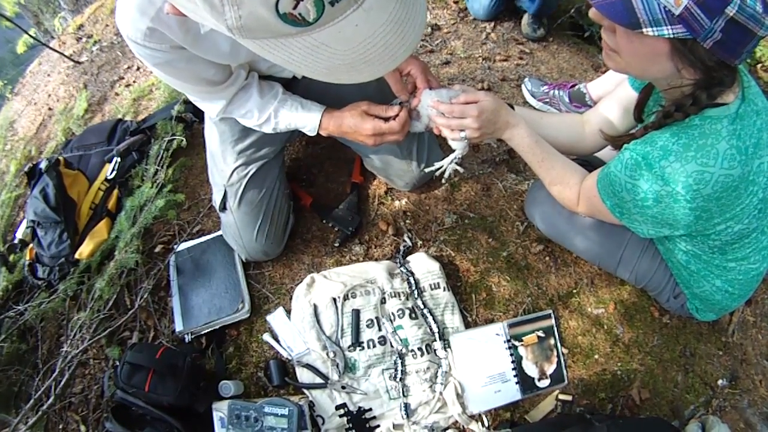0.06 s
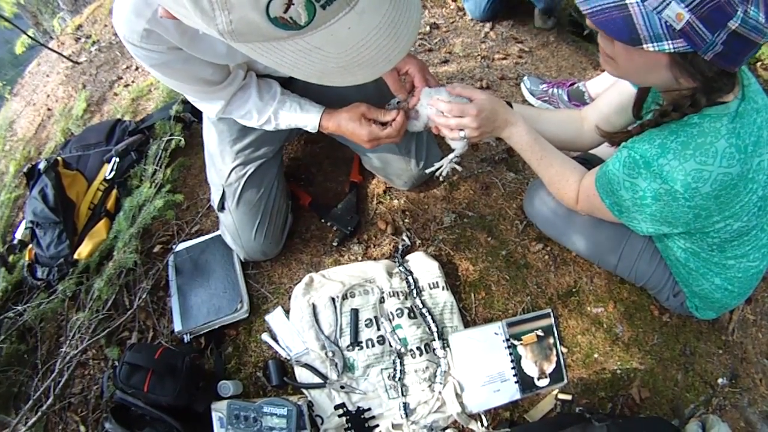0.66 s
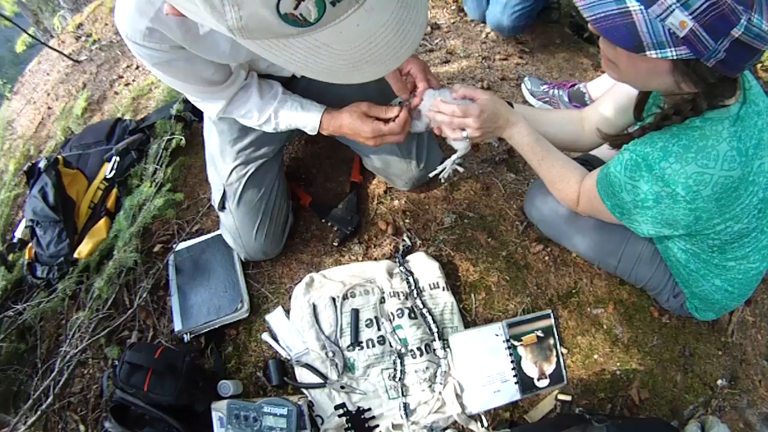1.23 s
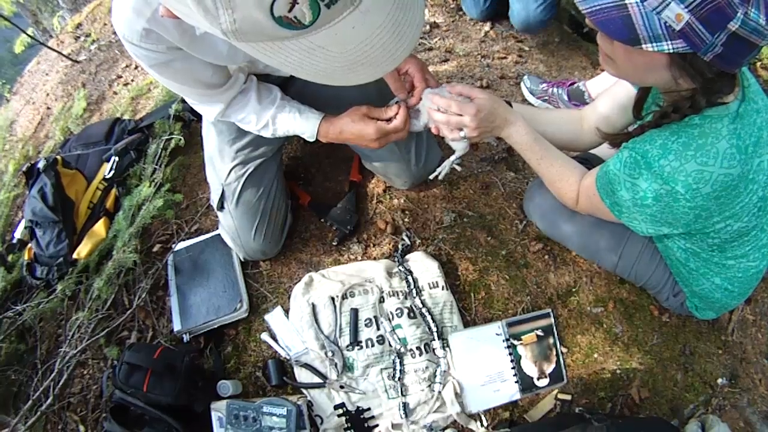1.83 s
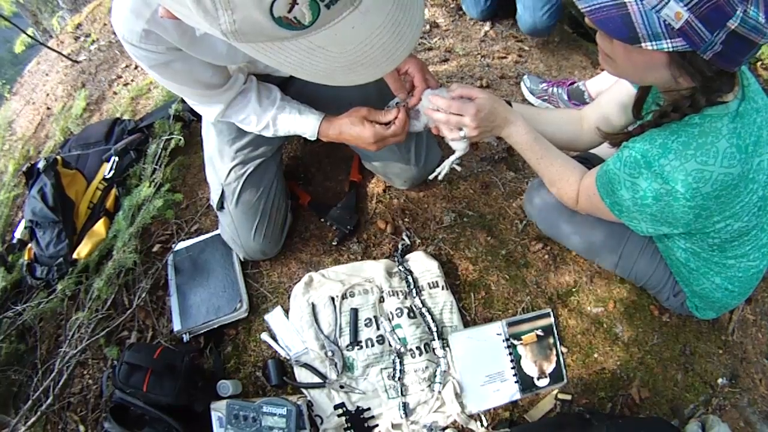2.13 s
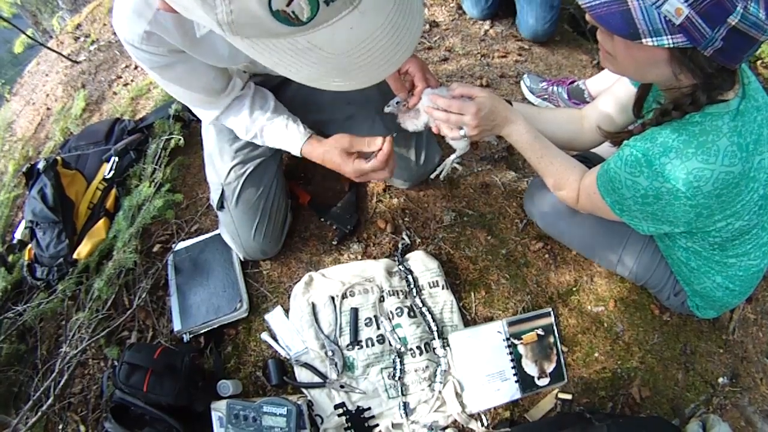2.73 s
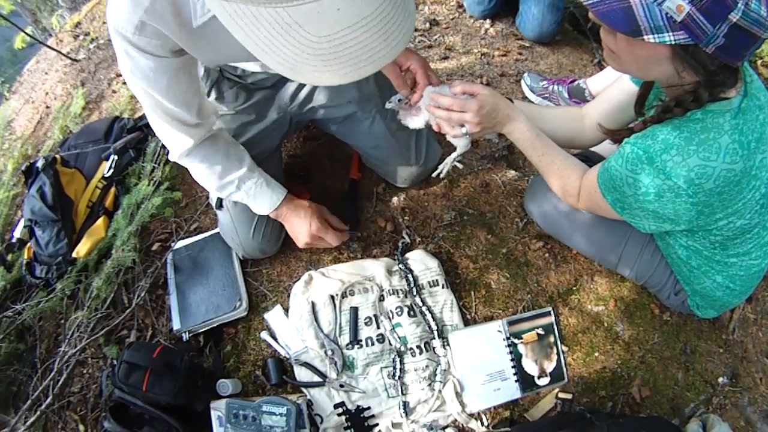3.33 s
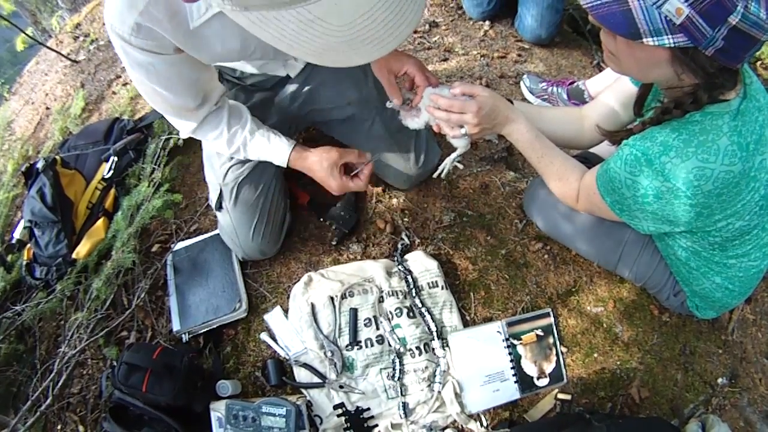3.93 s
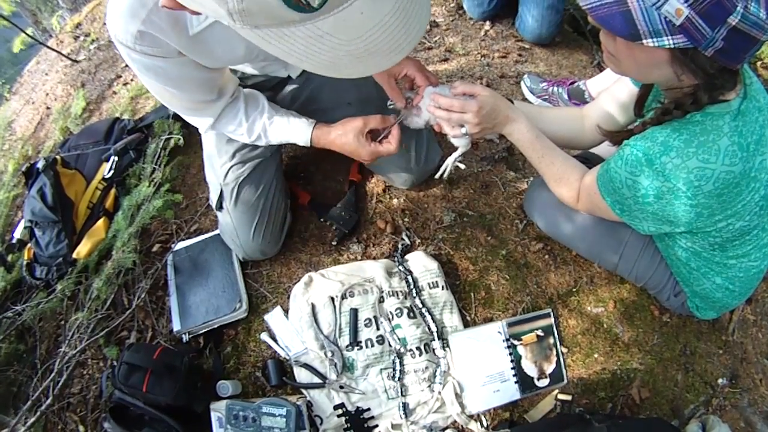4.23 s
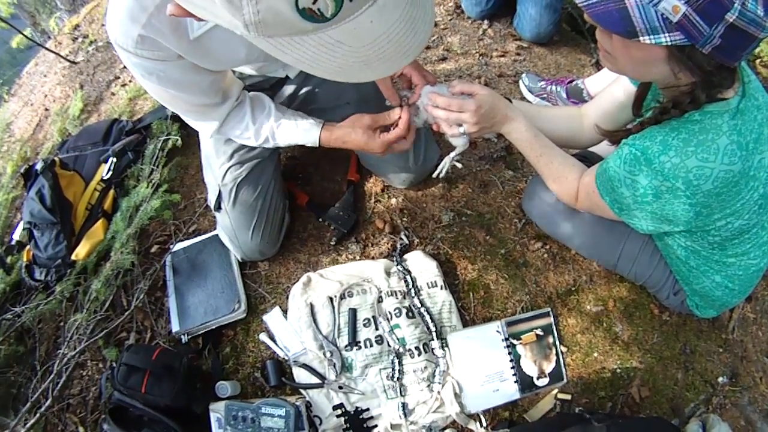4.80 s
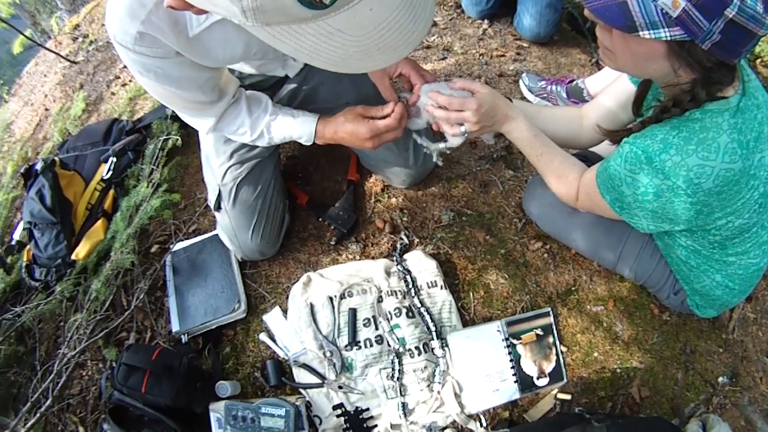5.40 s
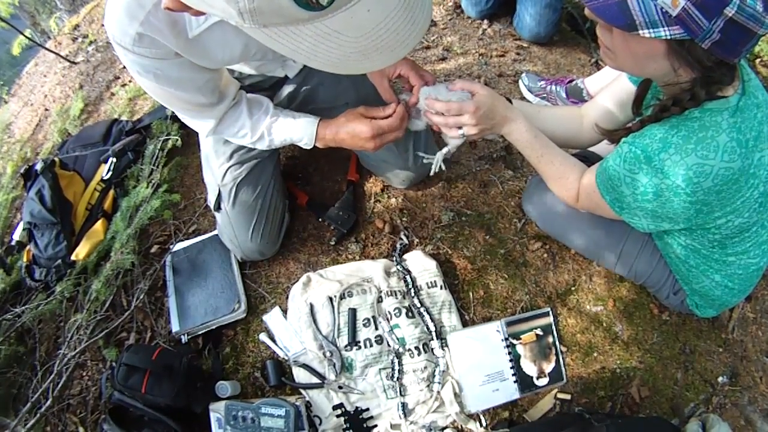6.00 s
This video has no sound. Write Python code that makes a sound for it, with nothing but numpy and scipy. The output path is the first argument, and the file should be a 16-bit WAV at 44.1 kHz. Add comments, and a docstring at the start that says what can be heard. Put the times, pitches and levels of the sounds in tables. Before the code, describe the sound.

Over soft outdoor hiss, a sharp click sounds, then a young bird of prey calls in a run of brief, raspy squeaks.

```python
"""On a forest floor, a falcon chick held in the hands complains close by.
Its syrinx sings a thin whistle and flutters in a hoarse rasp, then breaks into a short, mostly falling yelp.
Something hard snaps with a hollow knock, and small metal tools tick and ring, damped by the fingers.
Hands and knees bump and clothes rustle over the wide, steady hush of the forest."""
import sys
import numpy as np
from scipy import signal
from scipy.fft import rfft, irfft, next_fast_len
from scipy.io import wavfile
from scipy.ndimage import map_coordinates

SR = 44100
rng = np.random.default_rng(int(sys.argv[2]) if len(sys.argv) > 2 else 0)


def generate_wav(signal):
    """Clip the signal to [-1, 1] and save it as 16-bit WAV at the path in sys.argv[1]."""
    frames = np.transpose(np.atleast_2d(signal))
    scaled = np.clip(frames, -1, 1) * 32767
    pcm = np.round(scaled).astype(np.int16)
    wavfile.write(sys.argv[1], SR, pcm)


N = 271215
TOP_HZ = 15450
PRE_ROLL_S = 0.005  # room for each part of a call to fade in

# Colour of the air escaping with the voice. Each row: frequency in Hz, gain in dB.
BREATH_COLOUR = [(400, -34), (1000, -41), (2500, -17.5), (3200, 11), (3550, 0), (4100, 3), (4750, 2.5),
                 (5400, -4.5), (6150, 2), (7500, -8.5), (9500, -3), (11000, -15), (15000, -28)]


def chick(catch_s=0.0045, push_s=0.017, break_s=0.006, plain_overtones_db=-29):
    """The syrinx whistles over a growing rasp, pushes, catches, breaks into a yelp and closes hoarsely."""
    # The calls. Each row: yelp onset, lead-in length and yelp length in seconds; whistle, first yelp and
    # last yelp pitch in Hz; whistle, lead-in rasp, push and yelp level in dB; relative gain of the
    # octave, the upper overtones and the hiss in dB.
    calls = [ (2.003, .047, 0.0076, 2270, 1590, 1270, -46, -46.5, -42, -23, -39, -22, -26),
             (3.297, 0.074, 0.0091, 2304, 1793, 1290, -45, -48, -34, -23, -34, -29, -19),
             (3.600, 0.081, 0.023, 2140, 1360, 1320, -43, -45.5, -30, -13, -14.5, -20.5, -11),
             (3.859, 0.076, 0.018, 2090, 1462, 1250, -41, -40.5, -22.5, -13.5, -17, -14.5, -13),
             (4.094, .059, 0.038, 2074, 1520, 1258, -43, -46, -29, -12.5, -17.5, -12.5, -6),
             (4.322, 0.057, .021, 1950, 1602, 1306, -57, -39.5, -21, -10, -15.5, -11, -9),
             (4.39, 0.047, 0.017, 1400, 1374, 1344, -31, -34.5, -25.5, -14, -6, -12, -7),
             (4.791, 0.037, 0.04, 2250, 1876, 1890, -43, -41, -45, -35, -25, -25, -16),
             (4.878, 0.054, 0.014, 2390, 1270, 1183, -44, -44, -32, -24.5, -15, -12, -19),
             (5.26, .031, 0.035, 1750, 2366, 2440, -43, -41.5, -39, -26.5, -16, -6, -4),
             (5.347, 0.047, 0.017, 2250, 1630, 1466, -28.5, -32, -30, -10, -12.5, -29, -10.5),
             (5.698, .037, 0.015, 2384, 1632, 1315, -31, -41.5, -30, -15, -21, -26, -13.5),
             (6.135, .047, 0.028, 2266, 1835, 1560, -40, -37, -23, -12.5, -31, -29, -16)]
    out = np.zeros(N)
    for onset, lead, length, whistle_hz, yelp_hz, last_hz, *levels in calls:
        whistle_db, lead_db, push_db, yelp_db, octave_db, upper_db, hiss_db = levels
        start = onset - PRE_ROLL_S
        drop_hz = yelp_hz - whistle_hz
        # the whistle slides up, sinks and fades while the rasp grows under it
        whistle_glide = whistle_hz * 2 ** np.array([-0.117, 0, -0.055])
        add(out, start - lead, note(lead, whistle_glide, ramp(whistle_db, -9.5), -25, -25))
        add(out, start - lead, rasp(lead, 1750, lead_db - 3.5, lead_db + 3.5, hiss_db))
        # a last hoarse push, then the voice catches and breaks
        push_hz = whistle_hz + 0.74 * drop_hz
        add(out, start - catch_s - push_s, rasp(push_s, push_hz, push_db - 8, push_db, hiss_db))
        break_hz = whistle_hz + 0.541 * drop_hz
        break_glide = ramp(break_hz, yelp_hz - break_hz)
        voice_break = note(break_s, break_glide, ramp(-31, 4), plain_overtones_db, plain_overtones_db)
        add(out, start - break_s, voice_break)
        # the yelp holds and dies away; the flutter under it swamps weak yelps, strong ones ring clear
        yelp_glide = ramp(yelp_hz, last_hz - yelp_hz)
        yelp_fade_db = yelp_db + np.array([0, -4.5, -12])
        add(out, start, note(length, yelp_glide, yelp_fade_db, octave_db, upper_db))
        add(out, start, rasp(length, push_hz, -32, -46, hiss_db))
        # a quick closing plunge, and the rasp returns as the yelp dies
        plunge = last_hz * 2 ** ramp(0, -0.32)
        add(out, start + length, note(0.0061, plunge, ramp(-32, -4.5), octave_db, upper_db))
        add(out, start + 0.96 * length, rasp(0.02, last_hz, push_db - 7, push_db - 29.5, hiss_db))
    # At its harshest the voice doubles its period: start and length in seconds, pitch in Hz, level in dB.
    undertone = (4.392, .019, 688, -41)
    onset, length, hz, db = undertone
    growl = note(length, ramp(hz, 0), ramp(db, 0), plain_overtones_db, plain_overtones_db)
    add(out, onset - PRE_ROLL_S, growl)
    return out


def note(length, glide_hz, levels_db, octave_db, upper_db, jitter=0.019, shimmer_db=0.74, air_db=-17):
    """The syrinx sings a gliding, wavering tone; the throat shapes its upper overtones."""
    # Resonances of the throat. Each row: frequency in Hz, gain in dB.
    throat = [(3000, 4), (3900, -6.5), (4600, -3), (5400, -15), (6400, -10), (7600, -19), (9000, -10.5),
              (10200, -12.5), (11300, -26), (13000, -23), (15500, -41)]
    t = np.arange(-PRE_ROLL_S, 0.1, 1 / SR)
    progress = np.clip(t / length, 0, 1)
    pitch = arc(progress, *glide_hz) * (1 + jitter * wobble(t, 590))
    phase = 2 * np.pi * np.cumsum(pitch) / SR
    # each overtone swells on its own, and no two cycles are quite alike
    harmonics = np.arange(3, 11)[:, None]
    uneven_db = 2.4 * np.array([wobble(t, 140) for _ in harmonics])
    blur = 0.45 * np.array([wobble(t, 600) for _ in harmonics])
    gains = amp(along(throat, harmonics * pitch) + uneven_db) * (harmonics * pitch < TOP_HZ)
    upper = (gains * np.sin(harmonics * phase + blur)).sum(0)
    tone = np.sin(phase) + amp(octave_db) * np.sin(2 * phase) + amp(upper_db) * upper
    air = amp(upper_db + air_db) * noise(BREATH_COLOUR, len(t)) * (1 + np.sin(phase))  # one puff a cycle
    level = amp(arc(progress, *levels_db) + shimmer_db * wobble(t, 440))
    return (np.sqrt(2) * tone + air) * level * gate(t, length, edge=0.0021)


def rasp(length, centre_hz, first_db, last_db, hiss_db, soft_width_hz=1100, loud_width_hz=380):
    """The syrinx flutters irregularly; the harder it is blown, the closer it locks to one pitch."""
    # Colour of the flutter. Each row: frequency in Hz, gain in dB.
    flutter_colour = [(700, -36), (1050, -41), (1300, 10.5), (1700, 7), (2250, 5.5), (2450, -4), (2800, 1),
                      (4000, -60)]
    t = np.arange(-PRE_ROLL_S, 0.1, 1 / SR)
    width_hz = np.interp((first_db + last_db) / 2, [-42, -28], [soft_width_hz, loud_width_hz])
    flutter = filtered(noise(flutter_colour, len(t)), lambda hz: 1 / (1 + 2j * (hz - centre_hz) / width_hz))
    swell = unit(abs(signal.hilbert(flutter)))
    flutter /= np.hypot(1.34, swell)  # the membranes cannot swing past their limit
    opening = gate(t, length, edge=0.0015)
    flutter /= np.sqrt(np.average(flutter ** 2, weights=opening))
    hiss = amp(hiss_db) * unit((1 + swell) * noise(BREATH_COLOUR, len(t)))  # each swell lets out more air
    return (flutter + hiss) * amp(np.interp(t, [0, length], [first_db, last_db])) * opening


def snap(ring_db=-17, ring_t60=0.02, scatter_db=-38, scatter_t60=0.22):
    """A sharp crack, a brief bright ring and a hollow knock, scattered by the ground and bodies nearby."""
    # The snap and its faint after-clicks. Each row: start in seconds, crack peak in dB, knock gain in dB.
    cracks = [(2.023, 1.5, -28.5), (2.0493, -23, -50), (2.0507, -19, -39), (2.089, -48, -44),
              (2.123, -49, -42)]
    # Colour of the crack. Each row: frequency in Hz, gain in dB.
    crack_colour = [(200, -29), (1500, -6), (2750, -8), (3200, -2.5), (3600, -26), (4050, -7), (4500, -16),
                    (5400, 1), (7200, 1), (8800, 5.5), (9500, -1.5), (11300, -0.5), (14300, -11),
                    (16000, -38)]
    # Modes of the hollow body. Each row: frequency in Hz, gain in dB, seconds to fall by 60 dB.
    body_modes = [(309, -5.5, 0.18), (488, -2.5, 0.064), (634, 4.5, 0.029), (1170, 2.5, 0.034),
                  (1580, -3, 0.04), (2060, -4, 0.013)]
    out, t = np.zeros(N), np.arange(SR // 5) / SR
    crack = impulse(crack_colour)
    tail = amp(ring_db - 60 * t / ring_t60) + amp(scatter_db - 60 * t / scatter_t60)
    for start, db, knock_db in cracks:
        add(out, start, amp(db) * crack / abs(crack).max())
        add(out, start, amp(db) * tail * noise(crack_colour, len(t)))
        add(out, start, amp(knock_db) * ringing(body_modes, t))
    return out


def tool_clinks(ring_db=-6, tick_db=-8, tick_t60=0.037):
    """Small metal pieces tick and ring briefly, damped by the fingers."""
    # Tools touching. Each row: start in seconds, gain in dB, extra gain of the ring in dB.
    touches = [(0.509, -38, 1), (.770, -37, -18), (1.019, -33, -18), (1.113, -35, -4), (1.860, -32, -18),
               (3.2942, -24.5, 10.5), (3.2953, -35, 14), (3.326, -41, 5), (3.4927, -26, -18),
               (3.506, -29, 0), (3.649, -26.5, -4)]
    # Modes of the metal. Each row: frequency in Hz, gain in dB, seconds to fall by 60 dB.
    metal_modes = [(4420, -25.5, .03), (5290, 0, 0.019), (6070, 0, 0.014), (8300, -10, 0.023),
                   (11300, -24, 0.046), (12500, -7, 0.014), (13600, -24, .02)]
    # Colour of the contact tick. Each row: frequency in Hz, gain in dB.
    tick_colour = [(2500, -19), (4200, 7), (5400, 3.5), (7500, 5.5), (9000, 1), (12500, 4), (16000, -7)]
    out, t = np.zeros(N), np.arange(SR // 8) / SR
    for start, db, metal_db in touches:
        tick = amp(tick_db - 60 * t / tick_t60) * noise(tick_colour, len(t))
        ring = amp(ring_db + metal_db) * ringing(metal_modes, t)
        add(out, start, amp(db) * (tick + ring))
    return out


def soft_bumps(rise_s=0.0047, trim_db=-5):
    """Hands and knees land in dull, quickly fading thuds."""
    # The bumps. Each row: time in seconds, gain in dB.
    bumps = [(0.319, -38.5), (.545, -39.5), (.775, -38), (1.348, -39.5), (2.315, -34.5), (2.425, -30),
             (2.705, -38), (3.517, -42), (4.003, -39), (5.649, -31.5)]
    # Colour of a thud. Each row: frequency in Hz, gain in dB.
    thud_colour = [(30, -2), (70, 0.5), (135, 12.5), (190, 1.5), (280, -5.5), (600, -40)]
    out, t = np.zeros(N), np.arange(SR // 8) / SR
    envelope = t / rise_s * np.exp(1 - t / rise_s)
    for time, db in bumps:
        add(out, time - rise_s / 2, amp(db + trim_db) * envelope * noise(thud_colour, len(t)))
    return out


def body_movement(rest_rumble_db=-65.5, edge_s=0.055):
    """Arms and knees shift with a low rumble and the uneven brush of folding cloth."""
    # The moves. Each row: midpoint and length in seconds, rumble gain and cloth gain in dB.
    moves = [(.42, 0.24, -58, -67), (0.81, 0.36, -65, -51), (1.37, 0.24, -57, -56.5),
             (2.02, 0.22, -53, -52), (2.375, .16, -47, -57), (2.62, 0.11, -48, -65), (3.7, .8, -61.5, -74)]
    # Colours of the rumble and the cloth. Each row: frequency in Hz, gain in dB.
    rumble_colour = [(12, -34), (20, -17), (65, 19), (200, 0), (260, -50), (440, -120)]
    cloth_colour = [(80, 2), (200, 12), (600, 12), (1000, -6.5), (3000, -16), (8000, -4), (15000, -29)]
    t = np.arange(N) / SR
    rumble, cloth = amp(rest_rumble_db), 0
    for middle, length, rumble_db, cloth_db in moves:
        motion = gate(t - middle + length / 2, length, edge_s)
        rumble = rumble + amp(rumble_db) * motion
        cloth = cloth + amp(cloth_db) * motion
    folds = amp(4.5 * wobble(t, 45))
    return rumble * noise(rumble_colour, N) + cloth * folds * noise(cloth_colour, N)


def forest_hush(level_db=-45.5):
    """A steady outdoor hush, centred in the bass and wider towards the treble."""
    # Colour of the hush. Each row: frequency in Hz, gain in dB.
    hush_colour = [(59, -3), (100, -6), (140, -6.5), (162, -9), (205, -3.5), (420, -1.5), (457, -2),
                   (564, -2.5), (1260, -6.5), (1370, -6), (2870, -9.5), (14500, -16), (15500, -19)]
    # Stereo image. Each row: frequency in Hz, left-right likeness from 0 to 1.
    likeness = [(60, 1.0), (150, 0.99), (380, 0.95), (950, 0.89), (2380, 0.85), (5980, 0.6), (15000, 0.47)]

    def mid_side_gains(hz):
        angle = np.arccos(along(likeness, hz)) / 2
        return np.array([np.cos(angle), np.sin(angle)])

    mid, side = filtered(np.array([noise(hush_colour, N), noise(hush_colour, N)]), mid_side_gains)
    return amp(level_db) * unit(np.array([mid + side, mid - side]))


def ringing(modes, t):
    """Damped modes, struck a little differently each time, with a slightly unsteady ring."""
    return sum(amp(db + rng.normal() - 60 * t / t60) * np.sin(2 * np.pi * hz * t + 0.5 * wobble(t, 103))
               for hz, db, t60 in modes)


def impulse(colour, size=1024):
    """A minimum-phase click of the given colour."""
    cepstrum = irfft(np.log(amp(along(colour, np.fft.rfftfreq(size, 1 / SR)))))
    cepstrum[1:size // 2] *= 2
    cepstrum[size // 2 + 1:] = 0
    return irfft(np.exp(rfft(cepstrum)))


def noise(colour, size):
    """Coloured noise of rms 1."""
    return unit(filtered(rng.standard_normal(size), lambda hz: amp(along(colour, hz))))


def filtered(x, response):
    """Shape x with a gain that depends on frequency."""
    size = x.shape[-1]
    padded = next_fast_len(2 * size)
    return irfft(rfft(x, padded) * response(np.fft.rfftfreq(padded, 1 / SR)), padded)[..., :size]


def wobble(t, rate, size=256):
    """A smooth random curve, rate knots a second."""
    return map_coordinates(rng.standard_normal(size), [t * rate], mode="wrap")


def gate(t, length, edge):
    """Opens softly around 0 and closes around length."""
    return (1 + np.tanh(t / edge)) * (1 + np.tanh((length - t) / edge)) / 4


def ramp(first, change):
    """First, middle and last value of a steady change."""
    return first + change * np.array([0, 0.5, 1])


def arc(progress, first, middle, last):
    """A parabola through three values as progress goes from 0 to 1."""
    return np.polyval(np.polyfit([0, 0.5, 1], [first, middle, last], 2), progress)


def along(points, hz):
    """Read between (Hz, value) points on a log frequency axis."""
    freqs, values = np.transpose(points)
    return np.interp(np.log(abs(hz) + 1), np.log(freqs + 1), values)


def add(track, start, x):
    """Mix x into the track from start seconds on."""
    part = track[max(round(start * SR), 0):][:len(x)]
    part += x[:len(part)]


def amp(db):
    """Decibels to amplitude."""
    return 10 ** (np.asarray(db) / 20)


def unit(x):
    """Scale to rms 1."""
    return x / np.sqrt(np.mean(abs(x) ** 2) + 1e-20)


def scene():
    """Everything close sits in the middle; only the hush of the forest is wide."""
    near = chick() + snap() + tool_clinks() + soft_bumps() + body_movement()
    return near + forest_hush()


def record(dry):
    """A steep cut takes off the very top of the treble."""
    return filtered(dry, lambda hz: hz < TOP_HZ)


dry = scene()
out = record(dry)
generate_wav(out)
```